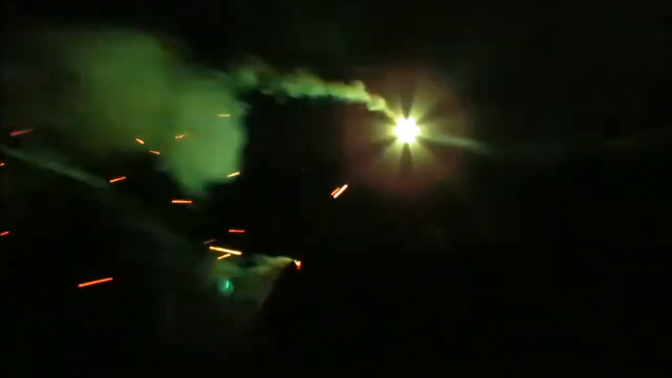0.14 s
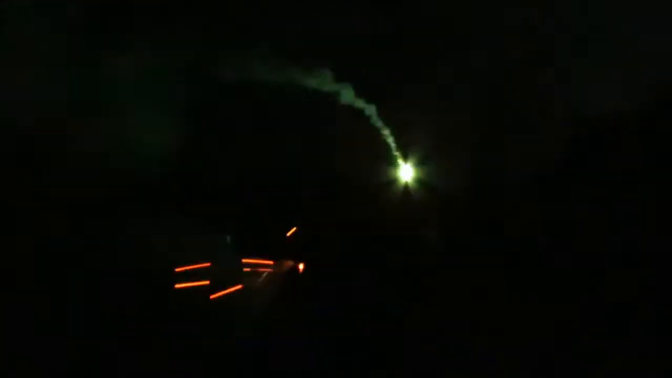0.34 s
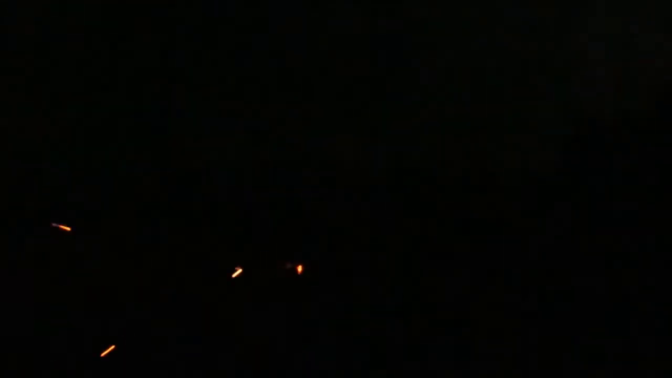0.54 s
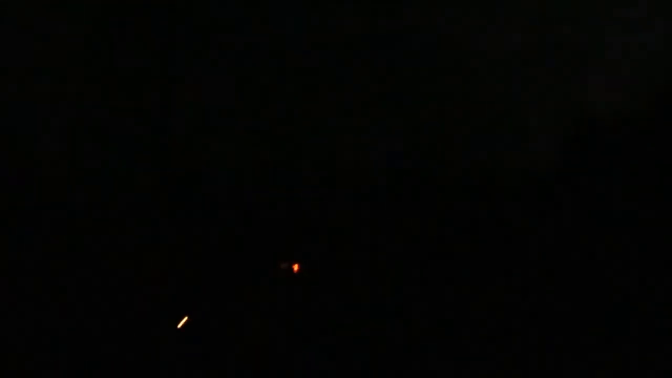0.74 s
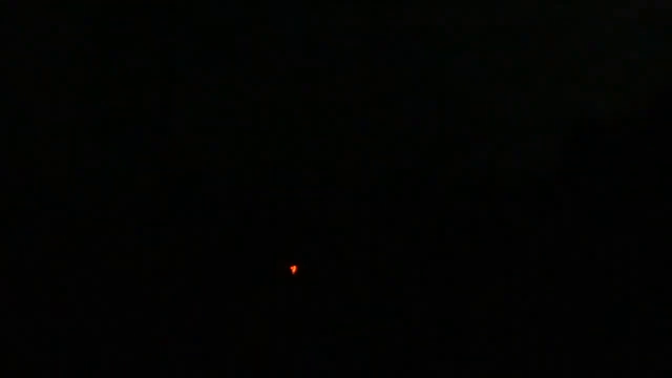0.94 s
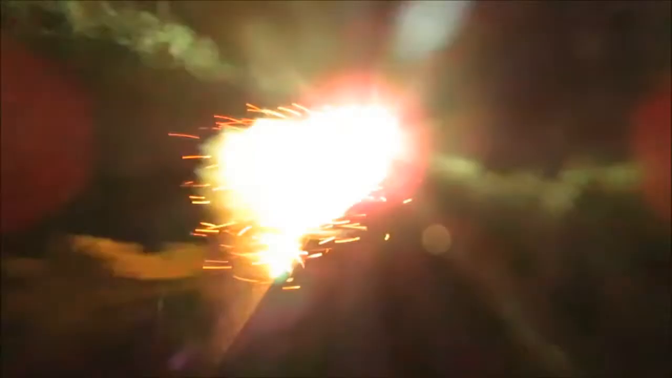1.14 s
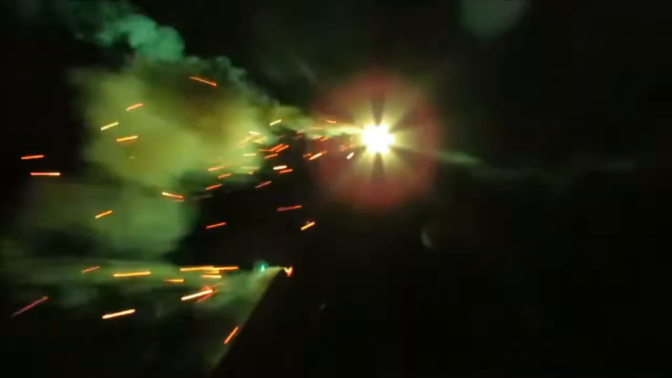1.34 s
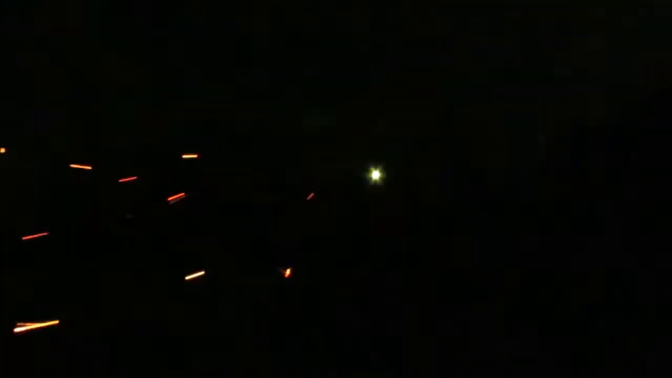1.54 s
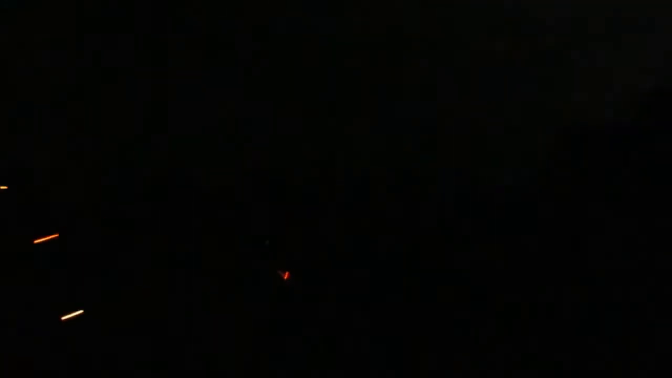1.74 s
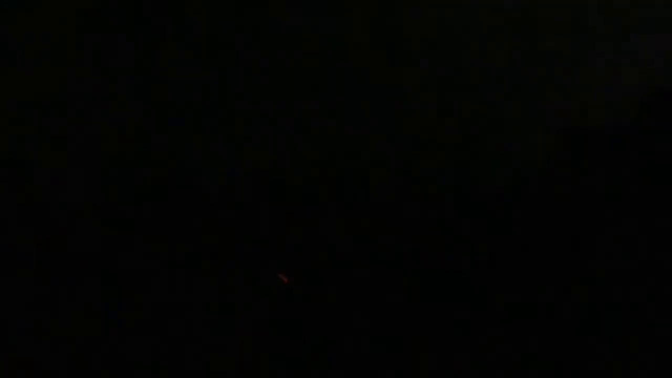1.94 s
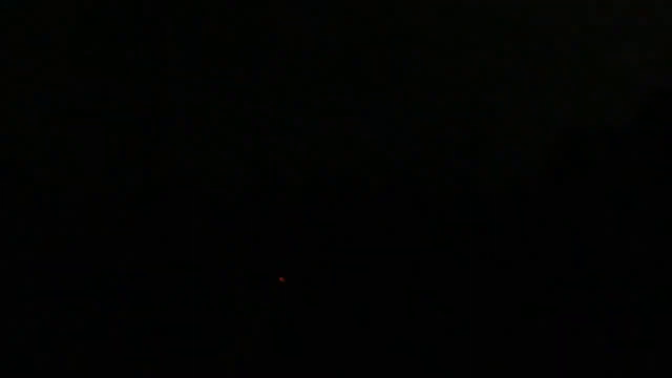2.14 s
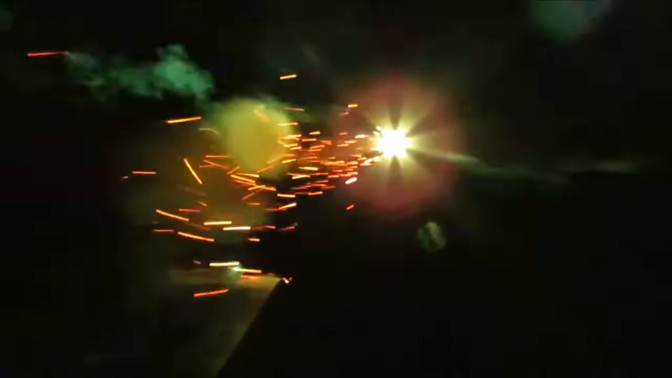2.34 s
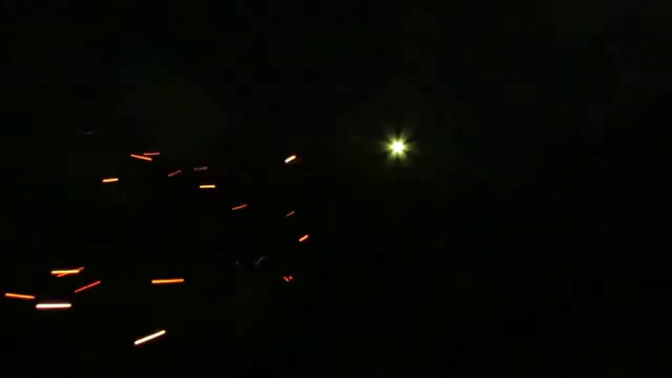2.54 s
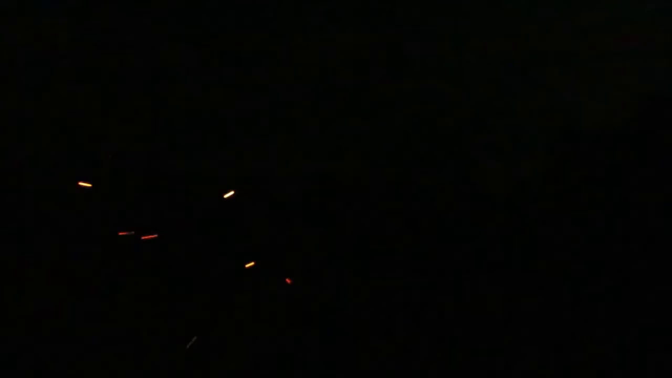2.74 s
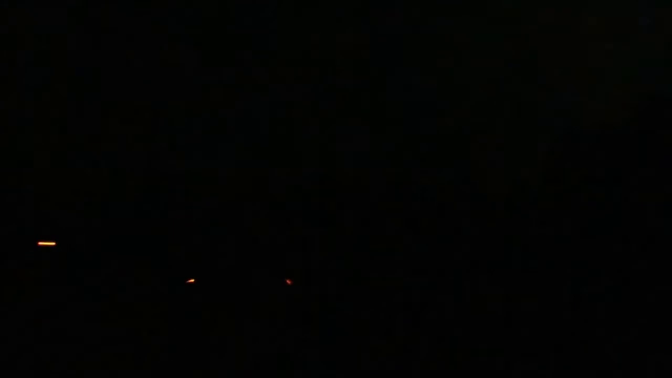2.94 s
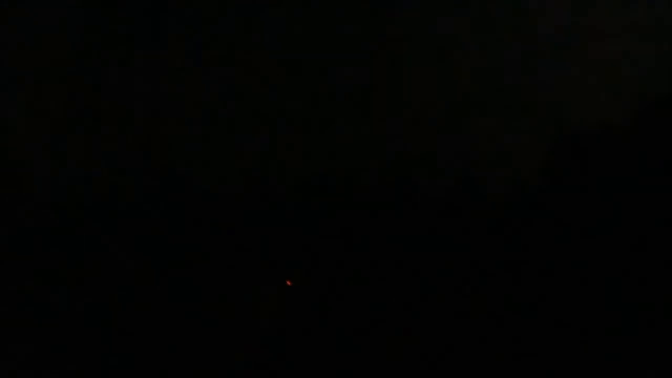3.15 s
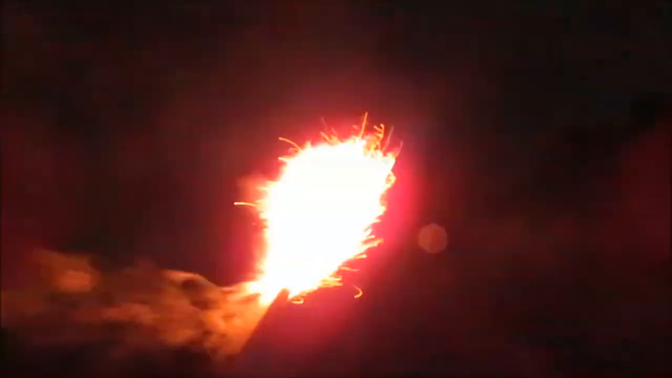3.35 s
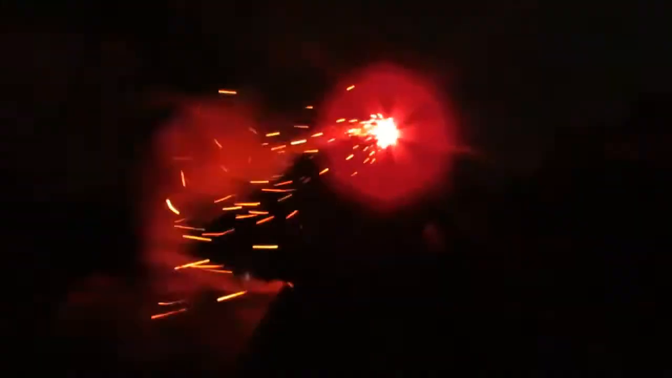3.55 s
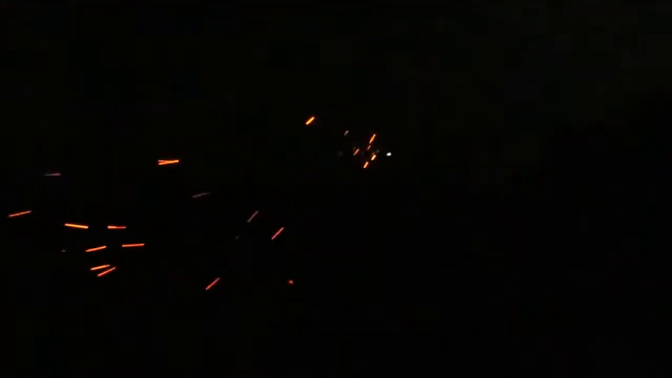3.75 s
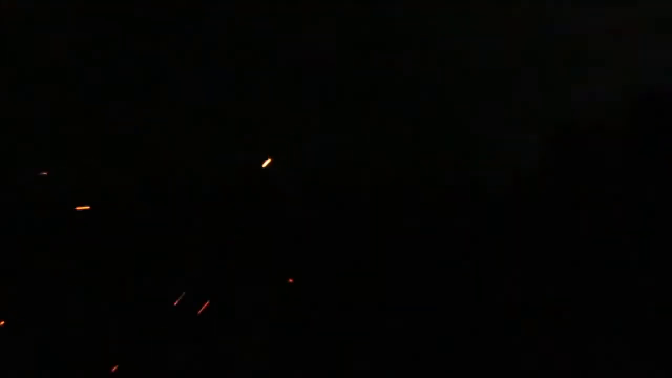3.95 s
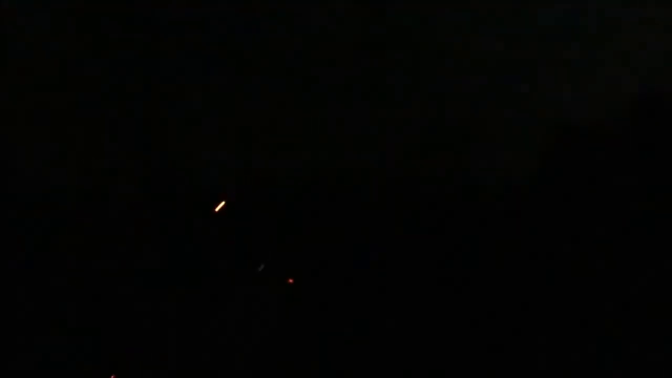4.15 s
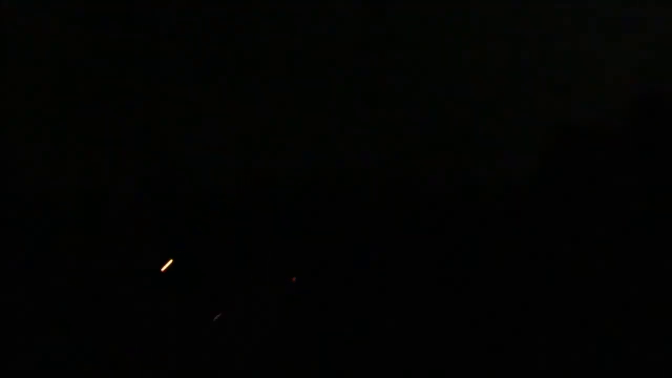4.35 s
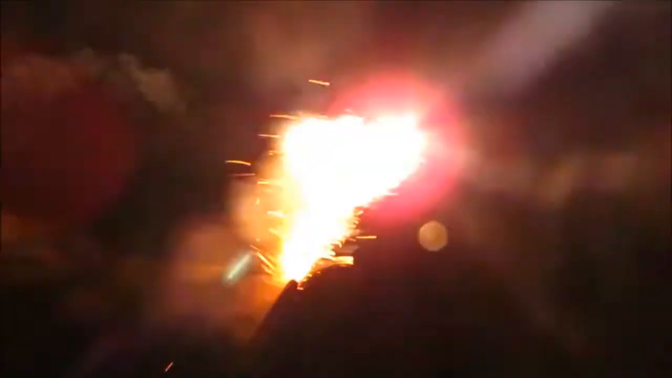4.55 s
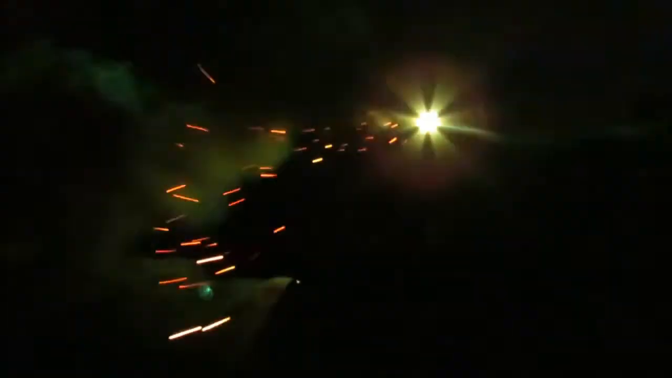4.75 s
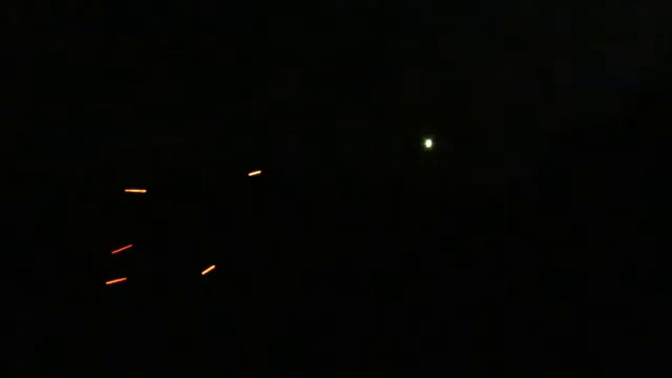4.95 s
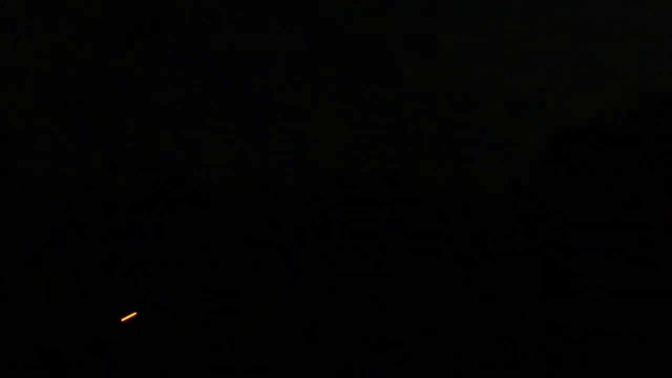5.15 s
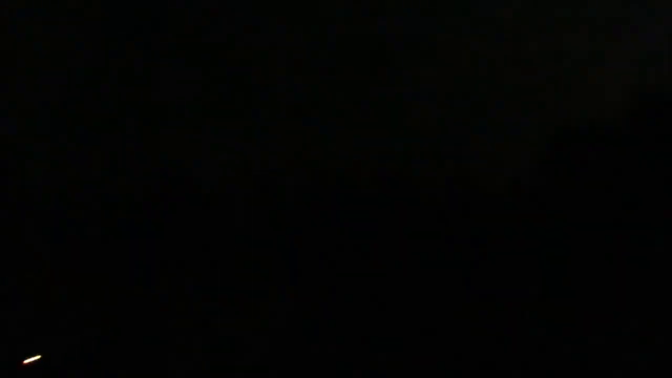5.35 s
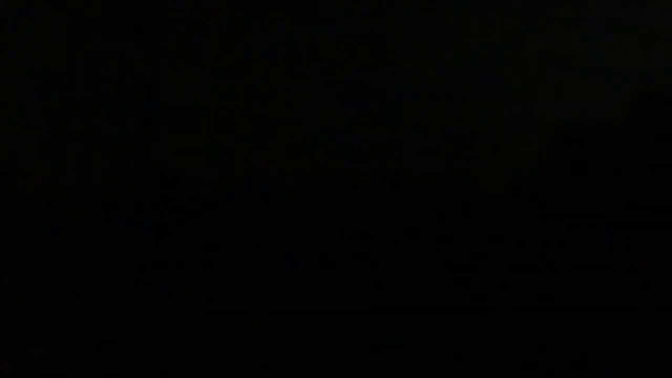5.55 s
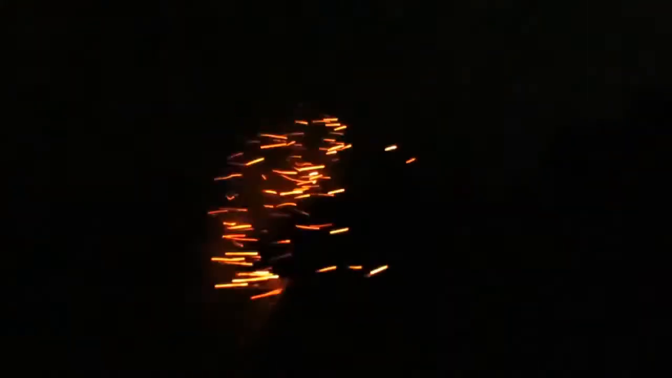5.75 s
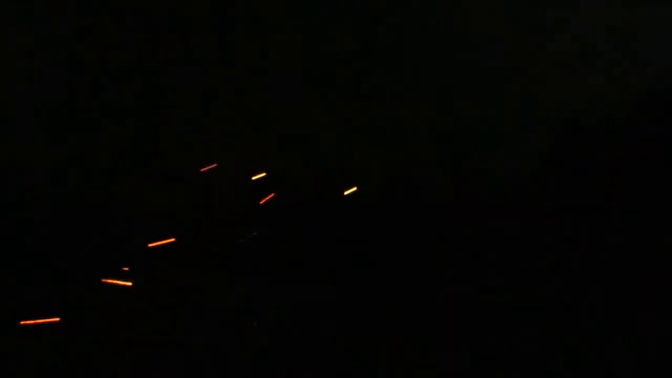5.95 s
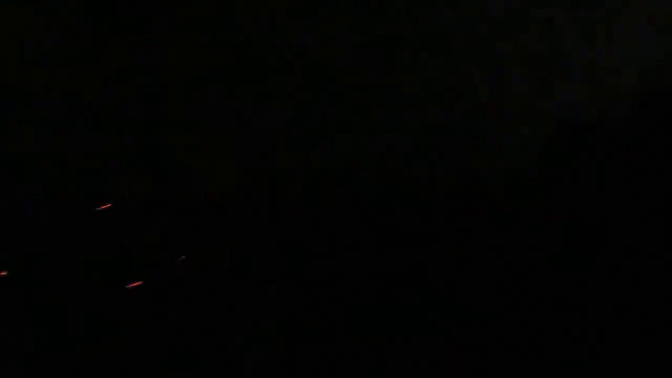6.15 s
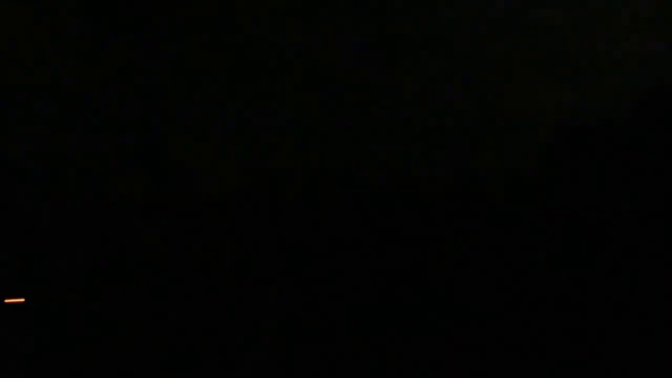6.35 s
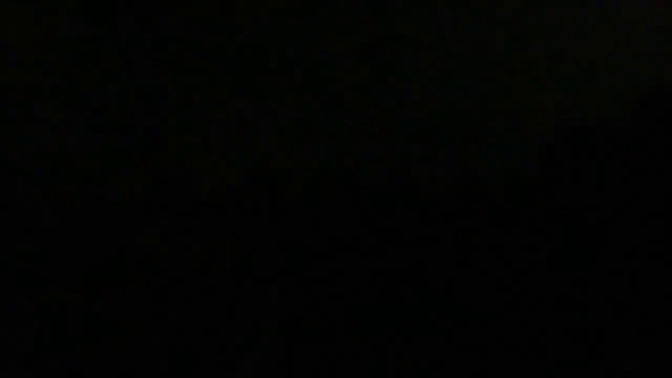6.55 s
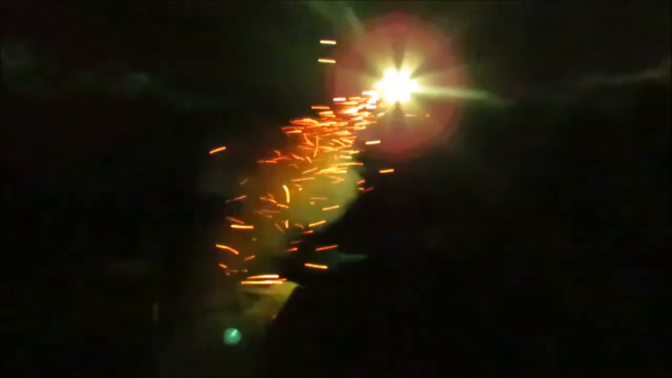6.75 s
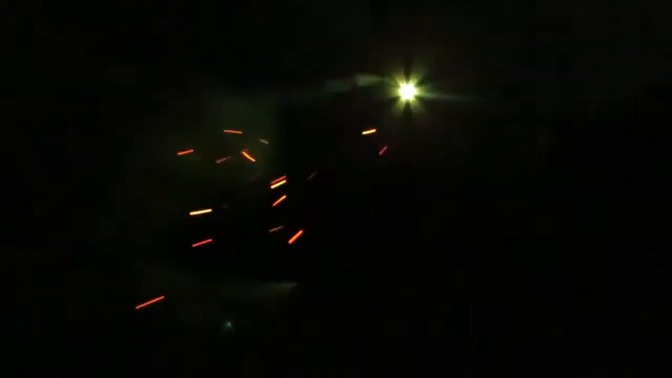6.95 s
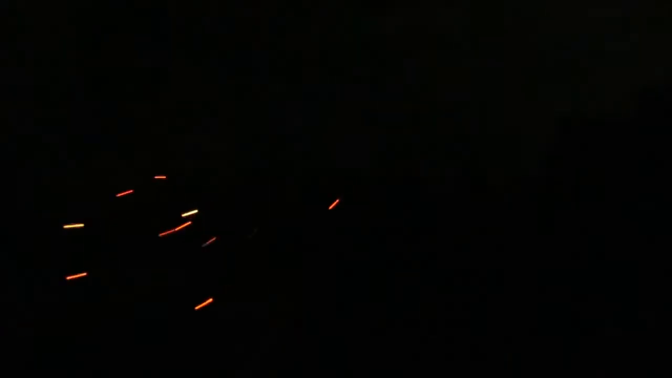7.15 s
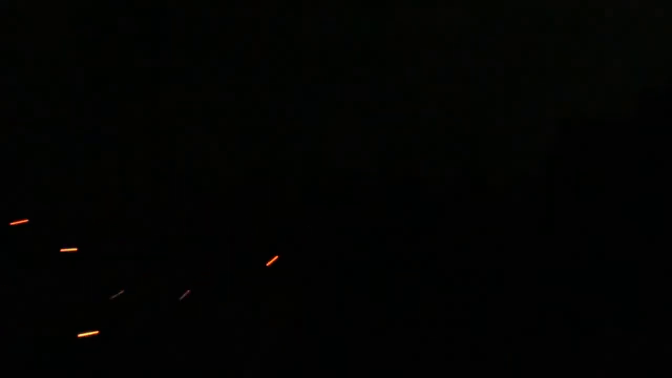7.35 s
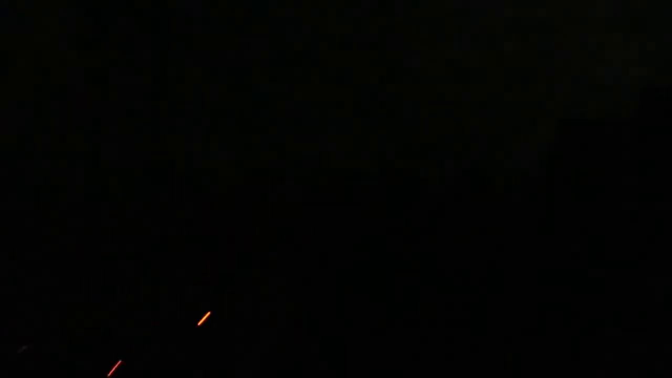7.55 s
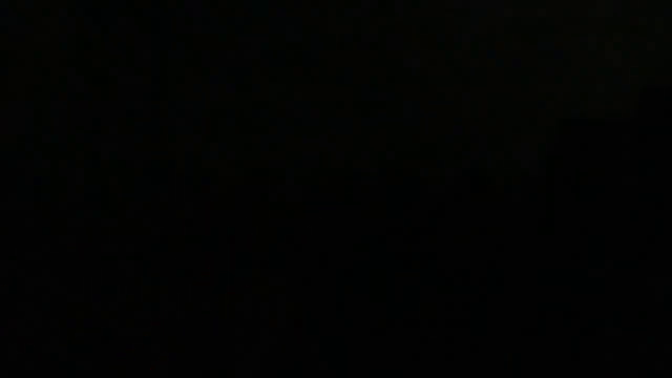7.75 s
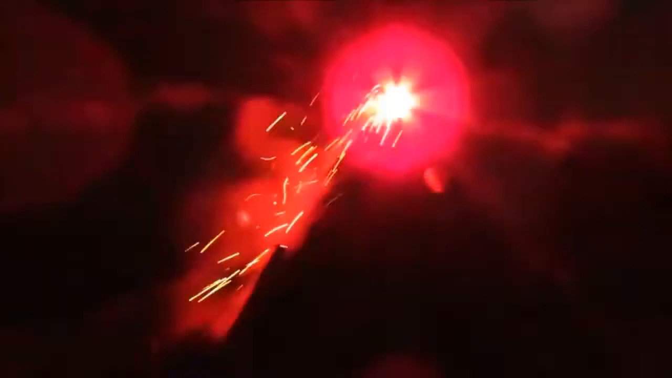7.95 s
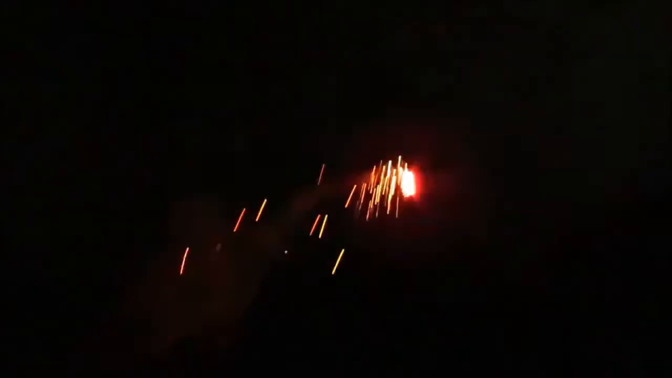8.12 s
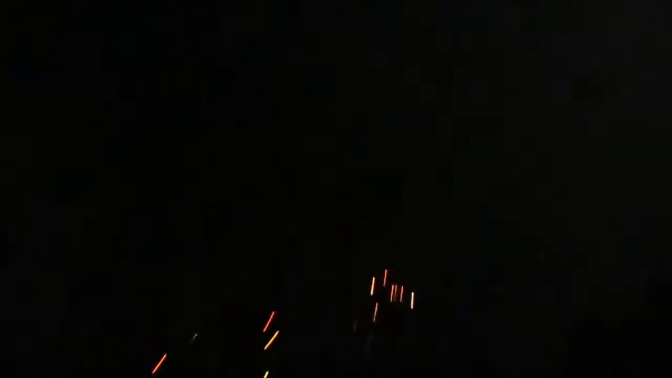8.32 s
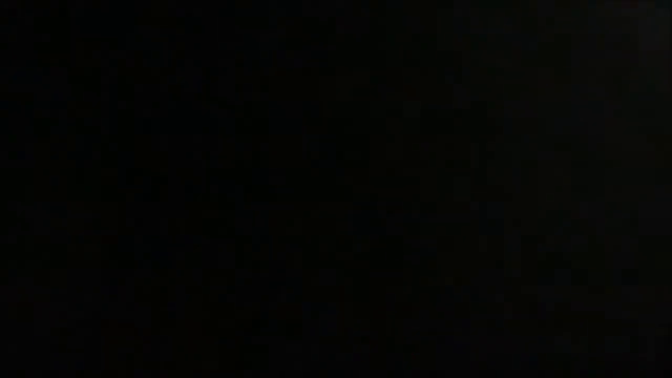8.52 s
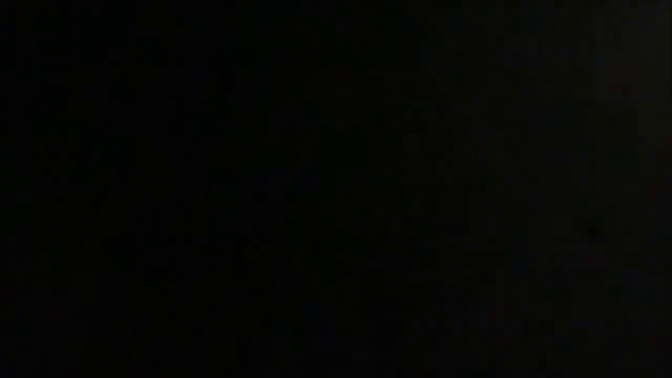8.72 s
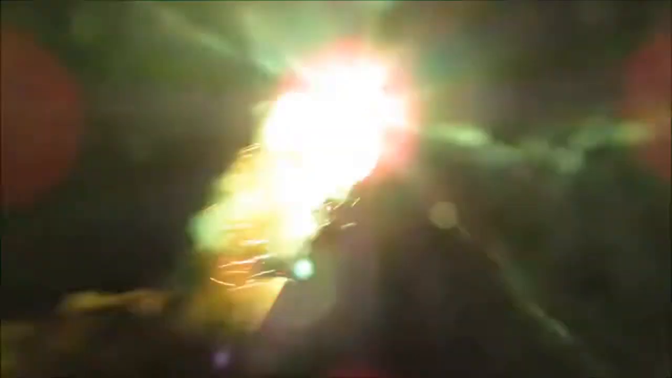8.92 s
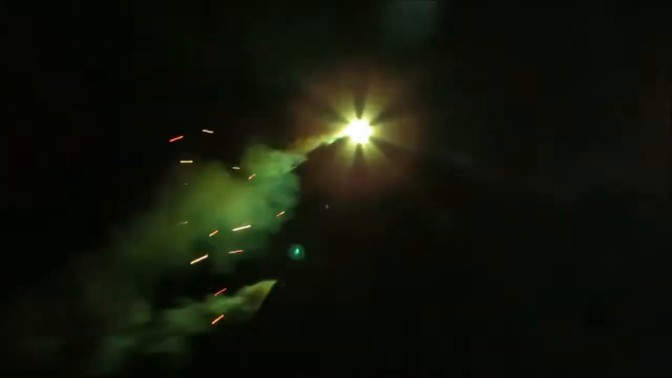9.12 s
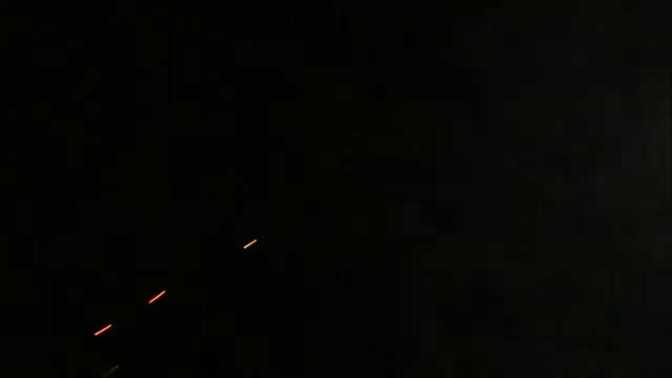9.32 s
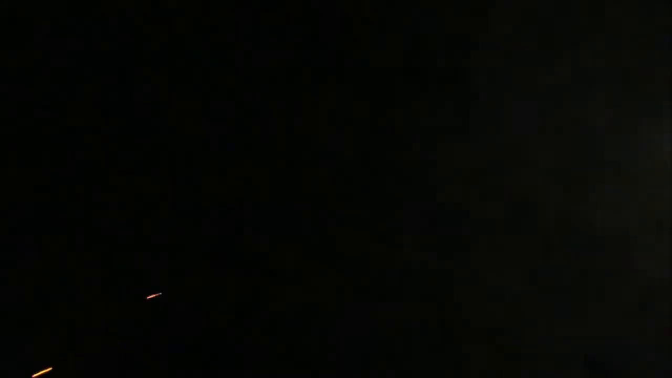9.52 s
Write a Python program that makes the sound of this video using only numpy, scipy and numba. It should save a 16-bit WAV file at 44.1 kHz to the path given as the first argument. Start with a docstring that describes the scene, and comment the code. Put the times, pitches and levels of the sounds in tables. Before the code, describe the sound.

A roman candle fizzes close by outdoors at night, firing eight sharp pops about a second apart, each trailed by a soft whoosh.

```python
"""A roman candle burns close by, outdoors at night. Its fuse fizzes inside the cardboard tube,
which rings lower and lower as the fire eats its way down. About once a second a powder charge
throws out a star with a sharp pop that overloads the microphone and echoes faintly.
Each star whooshes away, a few big sparks tick, and a light wind brushes the microphone."""
import sys
import numpy as np
from scipy import signal
from scipy.fft import rfft, irfft, next_fast_len
from scipy.io import wavfile
from scipy.ndimage import uniform_filter1d
from numba import njit

SR = 44100
rng = np.random.default_rng(int(sys.argv[2]) if len(sys.argv) > 2 else 0)


def master_out(mix):
    """Clip the mix to full scale and print it as 16-bit PCM to the path in sys.argv[1]."""
    frames = np.transpose(np.atleast_2d(mix))
    ceiling = np.clip(frames, -1, 1)
    pcm = np.round(ceiling * 32767).astype(np.int16)
    wavfile.write(sys.argv[1], SR, pcm)


N = 422478
TIME = np.arange(N) / SR

# Levels are relative. A rise or fall is the time a sound takes to grow or fade by 60 dB.
# The shots: t/s, level/dB, hold/s, fall/s, rush level/dB, rush rise/s,
# thump level/dB, crack level/dB, boom f/Hz, boom level/dB
SHOTS = [(1.144, -9, 0.0072, 0.051, -11, 0.11, -3, -3.5, 382, -3),
         (2.253, -7.5, 0.003, 0.07, -13.5, 0.031, -10.5, -6.5, 339.2, -6.5),
         (3.4, -11, 0.0037, 0.08, -2.5, 0.028, -8, -3, 139, -12),
         (4.5642, -7.5, 0.0046, 0.07, -11.5, 0.055, -8.5, -6.5, 469, -1.5),
         (5.676, -9.5, 0.0041, 0.061, -11.5, 0.032, -7.5, -3, 294, -4),
         (6.681, -9.5, 0.0054, 0.055, -13, 0.072, -8, -4.5, 280, -2),
         (7.8750, -13, 0.0061, 0.079, -8.5, 0.029, -8.5, -4, 485, -0.5),
         (8.8677, -15.5, 0.015, 0.057, -3.5, 0.054, -7.5, -4, 330, -7.5)]
# The bright tone of cracking powder: f/Hz, level/dB
CRACK_TONE = [(1000, -25.5), (3000, -6), (4500, 1), (6000, -4.5), (7200, -2.5), (11000, -7), (15500, -11.5)]


def undb(db):
    """Turn decibels into a number to multiply by."""
    return 10 ** (np.asarray(db) / 20)


def unit(x):
    """Scale a sound to an average strength (rms) of 1."""
    return x / np.sqrt(np.mean(x ** 2))


def colour(x, tone):
    """Shape a sound's bass and treble by rows of f/Hz, level/dB; the result has strength 1."""
    size = next_fast_len(len(x), real=True)
    hz, db = np.transpose(tone)
    bins = np.maximum(np.fft.rfftfreq(size, 1 / SR), 1)
    gain = undb(np.interp(np.log(bins), np.log(hz), db))
    return unit(irfft(rfft(x, size) * gain, size)[:len(x)])


def noise(tone):
    """The rush of swirling air, with the given tone."""
    return colour(rng.standard_normal(N), tone)


def wobble(rate):
    """Glide to a new random value, typically within 1 of zero, `rate` times a second."""
    step = max(int(SR / rate), 1)
    held = np.repeat(rng.standard_normal(N // step + 1), step)
    return 1.2 * uniform_filter1d(held, step)[:N]


def surge(peak, db, rise, fall):
    """A level that grows until the time `peak`, then dies away."""
    return undb(db - 60 * np.maximum((peak - TIME) / rise, (TIME - peak) / fall))


def burst(start, hold, fall, attack=0.00056, bend=1):
    """Pressure jumps up, holds and dies away; a bend over 1 steepens the end of the fall."""
    envelope = np.zeros(N)
    span = slice(int(start * SR), int(start * SR) + SR // 2)
    age = np.maximum(TIME[span] - start, 0)
    fade = np.exp(-np.log(1000) * (np.maximum(age - hold, 0) / fall) ** bend)
    envelope[span] = (1 - np.exp(-age / attack)) * fade
    return envelope


def swell(end, rise):
    """Pressure grows faster and faster, then stops at the time `end`."""
    envelope = np.zeros(N)
    span = slice(int(end * SR) - SR // 4, int(end * SR))
    envelope[span] = np.exp(np.log(1000) * (TIME[span] - end) / rise)
    return envelope


@njit
def resonance(x, hz, width_hz):
    """Ring at a moving pitch: a filter that keeps the sound near `hz` and weakens the rest."""
    y, band, low = np.empty(len(x)), 0., 0.
    for i in range(len(x)):
        tuning = np.tan(np.pi * min(hz[i], .45 * SR) / SR)
        damping = np.pi * width_hz / SR * (1 + tuning * tuning) / tuning
        swing = (band + tuning * (x[i] - low)) / (1 + tuning * (tuning + damping))
        band, low = 2 * swing - band, low + 2 * tuning * swing
        y[i] = damping * swing
    return y


def powder_layer():
    """Each shot bares new powder. Give the burning layer's row, age and used-up share over time."""
    # Layers of slow powder: depth/m, gas level/dB at start and end, spark level/dB at start and end
    layers = [(0.0384, -45, -51.5, -48, -53), (0.0472, -54, -59.5, -53, -65), (.0552, -57.5, -63, -56, -68),
              (0.0679, -58.5, -61, -55, -70.5), (0.0762, -58, -62, -58.5, -66.5),
              (0.0847, -59, -58, -62.5, -62.5), (.0946, -60.5, -68.5, -62.5, -69),
              (.1044, -58, -58, -60.5, -62.5), (.1110, -51.5, -61.5, -63, -59)]
    edges = np.array([0] + [shot[0] for shot in SHOTS] + [N / SR])
    burning = np.searchsorted(edges, TIME, side="right") - 1
    age = TIME - edges[burning]
    return np.array(layers)[burning].T, age, age / np.diff(edges)[burning]


def tube_pitch(sound_m_per_s=343, burn_m_per_s=0.0097):
    """The empty part of the tube holds a quarter of a wave, so its note sinks as the fire digs down."""
    (depth, *_), age, _ = powder_layer()
    return sound_m_per_s / (4 * (depth + burn_m_per_s * age))


@njit
def bounce(x, hz, share, treble_loss):
    """Sound runs down the tube and returns upside down, losing more treble on each trip."""
    y = x.copy()
    for i in range(128, len(x)):
        place = i - SR / (2 * hz[i])  # one round trip ago
        k = int(place)
        part = place - k
        returned = y[k] + part * (y[k + 1] - y[k])
        smoothed = (y[k - 1] + y[k + 1] + part * (y[k] + y[k + 2] - y[k - 1] - y[k + 1])) / 2
        y[i] -= share[i] * (returned + treble_loss * (smoothed - returned))
    return y


def tube(x, strength, treble_loss):
    """The tube's mouth sends part of a sound back inside, which makes it hollow."""
    # Reflection at the mouth: t/s, share sent back (before `strength` scales it)
    mouth = [(0, .15), (.9, .46), (2.5, 0.62), (3.7, .46), (5, 0.55), (7.4, 0.52), (8.5, 0.36)]
    share = strength * np.interp(TIME, *np.transpose(mouth))
    return bounce(x, tube_pitch(), share, treble_loss)


def burn_levels(sputter_half_s=0.042):
    """Gas and spark levels in dB: most layers die down as they burn, and the gas sputters at times."""
    # Brief sputters of the fuse: t/s, extra level/dB
    sputters = [(2.17, 1), (5.87, 4), (6.07, 3.5), (6.34, 2), (7.06, 4.5), (8.35, 2.5), (8.6, 2)]
    (_, gas_start, gas_end, sparks_start, sparks_end), _, spent = powder_layer()
    sputter = sum(db * np.exp(-((TIME - t) / sputter_half_s) ** 2) for t, db in sputters)
    gas_db = gas_start + spent * (gas_end - gas_start) + sputter
    return gas_db, sparks_start + spent * (sparks_end - sparks_start)


def fizz(clicks_db, rate, spread_db):
    """Hiss plus the tiny clicks of burning powder grains, a few much larger than the rest."""
    hiss = rng.standard_normal(N)
    size = undb(spread_db * np.minimum(rng.exponential(size=N), 6))
    clicks = unit((rng.random(N) < rate / SR) * size * rng.standard_normal(N))
    return hiss + undb(clicks_db) * clicks


def fuse():
    """Sputtering gas rings the deepening tube; most sparks spit in the open air above it."""
    # Tones of the escaping gas and of the sparks: f/Hz, level/dB
    gas_tone = [(80, -7.5), (250, 1), (700, -1.5), (1500, -3), (2300, 0), (3250, 4.5), (3750, -2),
                (5000, -2.5), (6300, -6), (8000, -4), (12000, -12), (15500, -21)]
    spark_tone = [(3000, -23), (6300, -6.5), (8000, -4.5), (11000, 0.5), (13500, -1), (15500, -6.5)]
    gas_db, sparks_db = burn_levels()
    gas = fizz(clicks_db=-7.5, rate=3300, spread_db=3) * undb(.9 * wobble(70))
    gas = undb(gas_db) * colour(gas, gas_tone)
    sparks_inside, sparks_outside = (
        undb(sparks_db) * colour(fizz(clicks_db=-5, rate=1300, spread_db=3.5), spark_tone)
        for _ in range(2))
    hiss = tube(undb(3.5) * gas + undb(-4) * sparks_inside, strength=1.1, treble_loss=.65)
    # the tube's lowest note sits a little flat and sounds strongest
    hollow = resonance(gas, .89 * tube_pitch(), width_hz=260.)
    return undb(-0.78 + 0.51 * wobble(13)) * (hiss + hollow + undb(-1) * sparks_outside)


def first_flame():
    """The early flame roars and flares near the mouth, then swells again as the first star flies off."""
    # Swells of the roar, the last for the first star's whoosh: peak t/s, level/dB, rise/s, fall/s
    swells = [(.22, -40, 11, 1.6), (.76, -47, .35, .6), (1.132, -26.5, 0.25, .08), (1.31, -47, 1.2, .5)]
    roar = noise([(60, -14), (300, -10.5), (1200, -7.5), (2100, -0.5), (3250, -6.5),
                  (3700, -14.5), (5500, -15.5), (7400, -10), (9000, -19.5), (15000, -23)])
    envelope = sum(surge(*row) for row in swells)
    flicker = undb(-0.5 + wobble(40))
    return tube(roar * envelope * flicker, strength=.8, treble_loss=.6)


def night_air():
    """Light wind and soft bumps on the microphone, over the hush of the night."""
    # Puffs of wind, then bumps: t/s, level/dB
    gusts = [(.15, -69), (.45, -69), (1.03, -71), (8.72, -61.5), (9.3, -66)]
    bumps = [(.35, -48), (.888, -51.5), (1.003, -57), (8.68, -56)]
    # Tones of the wind's rumble and of the quiet night: f/Hz, level/dB
    wind_tone = [(20, -6.5), (45, -1), (75, 4.5), (130, -10), (300, -17.5), (1000, -43.5), (4000, -66.5)]
    night_tone = [(30, -3), (150, 0), (500, 0), (1000, -9.5), (3000, -15), (15000, -31.5)]
    bump_noise = noise([(30, -4.5), (120, 0), (300, -7), (1000, -19), (4000, -62)])
    thuds = bump_noise * sum(undb(db) * burst(t, hold=.015, fall=.15, attack=.003) for t, db in bumps)
    breeze = undb(-77.5) + sum(surge(t, db, rise=0.87, fall=2.5) for t, db in gusts)
    wind = noise(wind_tone) * breeze * undb(4 * wobble(8.3))
    return wind + thuds + undb(-71) * noise(night_tone)


def shots():
    """Gas rushes past the star, then the charge bursts: a hard pop, a ragged blast, a slower thump."""
    # Powder catching just before a shot: t/s, level/dB, fall/s
    flares = [(1.1320, -11.5, 0.095), (2.2471, -18, .03), (5.6660, -23, .035), (8.852, -40, .04)]
    # Tones of the blast and of the deep thump: f/Hz, level/dB
    blast_tone = [(30, -44.5), (70, -20.5), (200, -7), (450, -0.5), (700, 1), (1400, 2.5), (2300, 0),
                  (3150, 3.5), (3650, -5.5), (5000, -16), (8000, -24.5), (15500, -29.5)]
    thump_tone = [(25, -39), (45, -17), (75, 1), (120, 5), (190, 2.5), (300, 0), (480, -1.5), (700, -10.5),
                  (1500, -29), (5000, -59.5)]
    # Short rings that each blast sets off around the tube: f/Hz, width/Hz, level/dB
    rings = [(362, 76, -1.5), (643, 77, -5), (770, 82, -4), (1330, 75, -1), (2080, 120, -5.5),
             (2940, 130, -10), (3530, 100, -7.5), (4530, 160, -7)]
    blast, thump, crack, boom = np.zeros((4, N))
    for t, db, hold, fall, rush_db, rise, thump_db, crack_db, boom_hz, boom_db in SHOTS:
        rush = undb(rush_db) * swell(t, rise)
        pop = undb(-6.5) * burst(t, hold, fall=0.021)
        blast += undb(db) * (undb(-2) * rush + pop + burst(t, hold, fall, bend=1.22))
        push = burst(t, hold, 1.25 * fall, attack=.0005)
        # air rushes back into the emptied tube with a second, weak thump
        rebound = undb(-12.5) * burst(t + 0.026, hold=0.0065, fall=0.037, attack=0.0044)
        thump += undb(db + thump_db) * (undb(-10) * rush + push + rebound)
        crack += undb(db + crack_db) * (rush + undb(-2.5) * pop + burst(t, hold, .82 * fall, bend=1.25))
        # each pop has a short, low boom at its own pitch
        note = np.sin(2 * np.pi * boom_hz * (TIME - t))
        boom += undb(db + boom_db) * burst(t, hold=0.0029, fall=0.041) * note
    for t, db, fall in flares:
        flare = undb(db) * burst(t, .003, fall)
        blast += flare
        crack += undb(-6.5) * flare
    gas = (blast * noise(blast_tone) + crack * noise(CRACK_TONE)) * undb(1.4 * wobble(500))
    gas += thump * noise(thump_tone)
    body = sum(undb(db) * resonance(gas, np.full(N, float(hz)), float(width)) for hz, width, db in rings)
    hollow = resonance(gas, .9 * tube_pitch(), width_hz=300.)
    return undb(-2) * gas + undb(-4.5) * body + undb(-12.5) * hollow + boom


def echo(x, db, fall, build_s):
    """Sound bounces back from ground, trees and houses, building up and then fading."""
    # Tone of the echo: f/Hz, level/dB
    echo_tone = [(60, -11), (250, -2), (900, 0.5), (2000, -3.5), (3200, 4.5), (3800, -4), (6000, -13),
                 (10000, -20.5), (15500, -39.5)]
    age = TIME[:2 * SR]
    returns = colour(rng.standard_normal(len(age)), echo_tone) * undb(1.8 * wobble(22)[:len(age)])
    returns *= (1 - np.exp(-age / build_s)) * np.exp(-np.log(1000) * age / fall)
    return undb(db) * signal.fftconvolve(x, returns / np.sqrt(np.sum(returns ** 2)))[:N]


def stars():
    """Each star catches fire at the tube's mouth, whooshes and fades as it flies off."""
    # Whooshes of the stars: peak t/s, level/dB, rise/s, fall/s
    flights = [(1.29, -46, .7, 1.1), (2.37, -46.5, .5, 0.7), (3.50, -45, .6, 0.92), (4.74, -52, .8, 1.3),
               (5.85, -58.5, .7, 0.8), (6.83, -52.5, .7, 1.1), (8.02, -50.5, .9, 1.34),
               (9.02, -52.5, .6, 1.9)]
    # Tone of a burning star: f/Hz, level/dB
    star_tone = [(100, -14.5), (400, -7), (1000, -2.5), (1800, -2), (3200, 0), (3800, -6.5), (5000, -6.5),
                 (7000, -12), (15500, -19.5)]
    envelope = sum(surge(*row) for row in flights)
    whoosh = envelope * noise(star_tone) * undb(wobble(80))
    return tube(whoosh, strength=.33, treble_loss=.5)


def big_sparks():
    """A few large sparks burst, each with a dry tick."""
    # Single sparks: t/s, level/dB
    ticks = [(3.3466, -53), (3.3681, -47), (6.6156, -46), (7.7817, -52.5), (7.8077, -51)]
    envelope = sum(undb(db) * burst(t, hold=.0008, fall=.012, attack=.0002) for t, db in ticks)
    return envelope * noise(CRACK_TONE)


def scene():
    """The candle, its echo and the night air, in one channel."""
    candle = fuse() + first_flame() + shots() + stars() + big_sparks()
    return (candle + echo(candle, db=-41.5, fall=0.37, build_s=.03) + night_air())[None]


def record(dry):
    """The microphone overloads on the pops; the deepest bass and highest treble are cut."""
    ceiling, bottom_hz, top_hz = .92, 38, 15800
    squashed = dry / (1 + np.abs(dry / ceiling) ** 6) ** (1 / 6)
    thinned = signal.sosfilt(signal.butter(2, bottom_hz, "high", fs=SR, output="sos"), squashed)
    return signal.sosfilt(signal.ellip(10, .1, 75, top_hz, fs=SR, output="sos"), thinned)


dry = scene()
out = record(dry)
master_out(out)
```